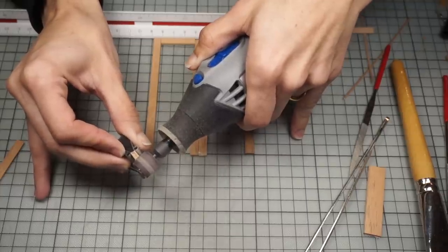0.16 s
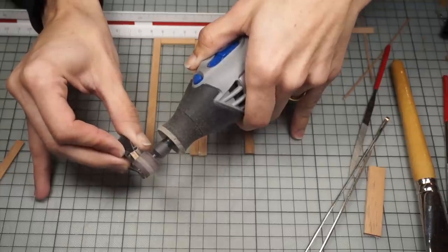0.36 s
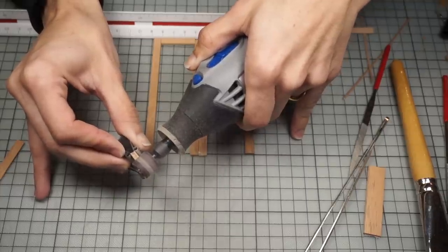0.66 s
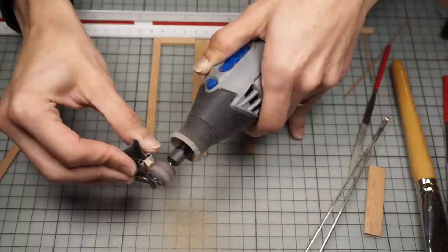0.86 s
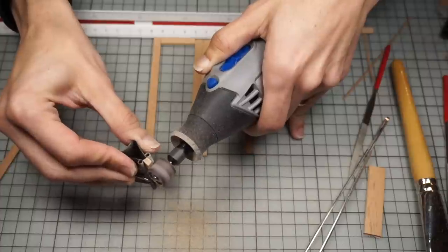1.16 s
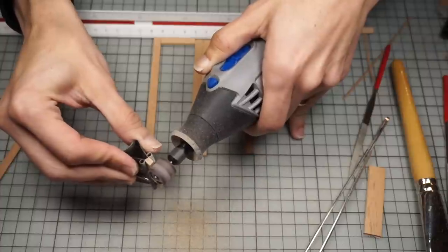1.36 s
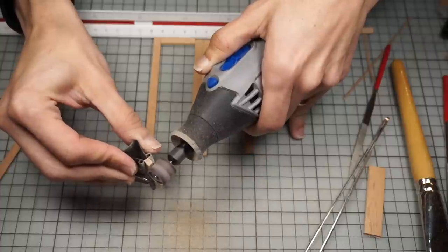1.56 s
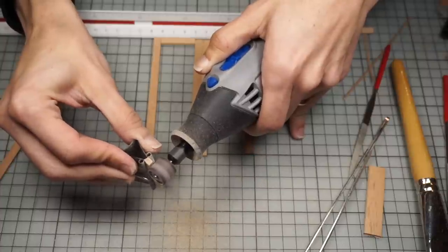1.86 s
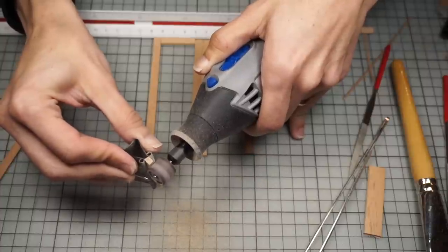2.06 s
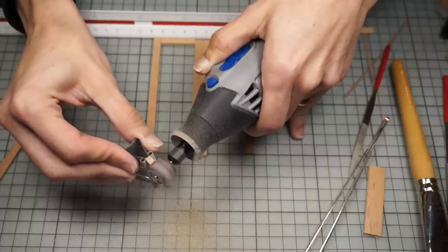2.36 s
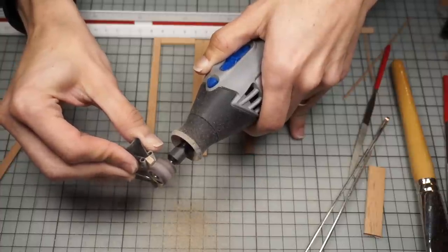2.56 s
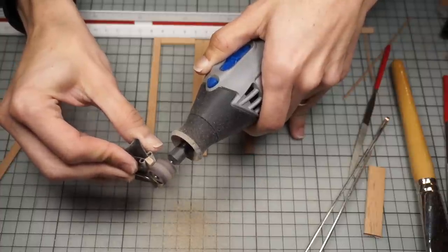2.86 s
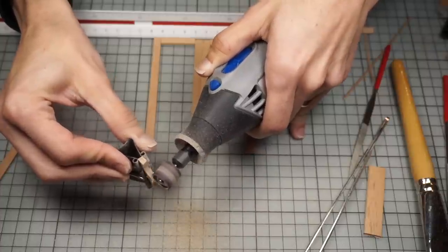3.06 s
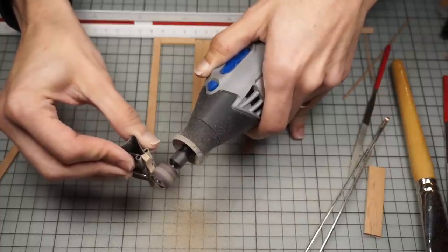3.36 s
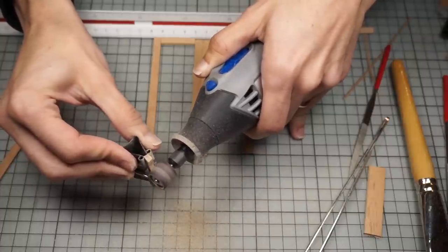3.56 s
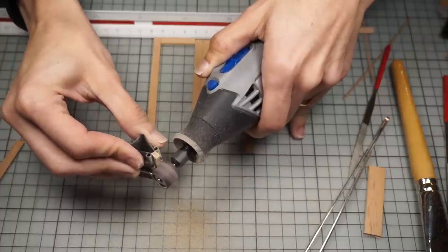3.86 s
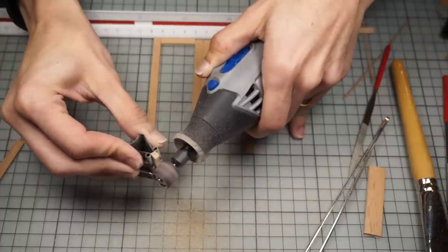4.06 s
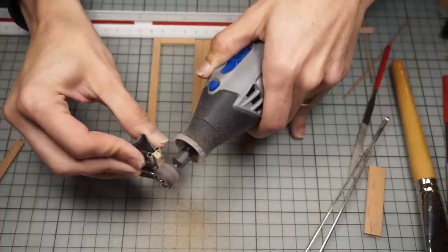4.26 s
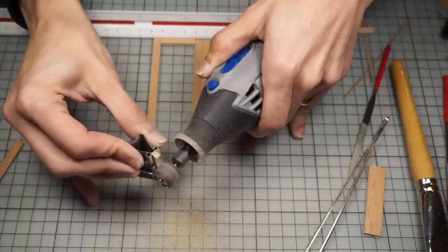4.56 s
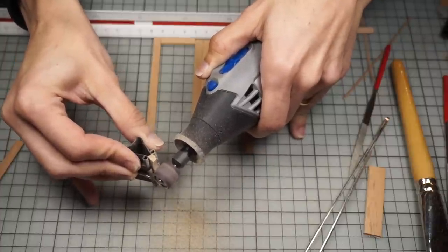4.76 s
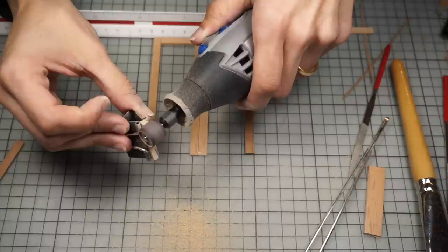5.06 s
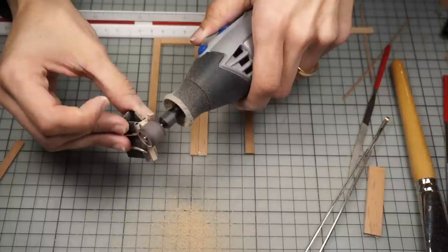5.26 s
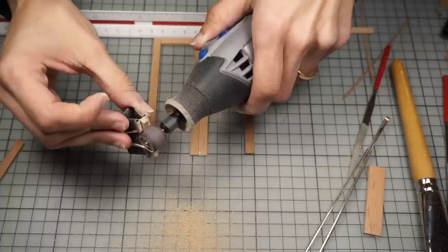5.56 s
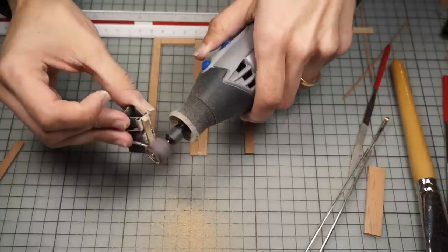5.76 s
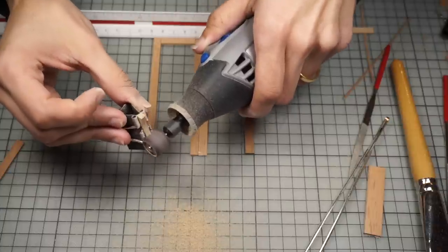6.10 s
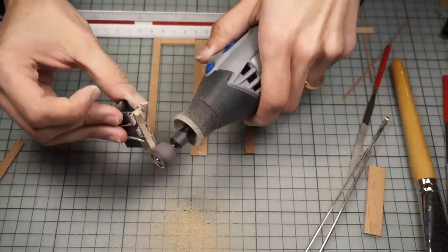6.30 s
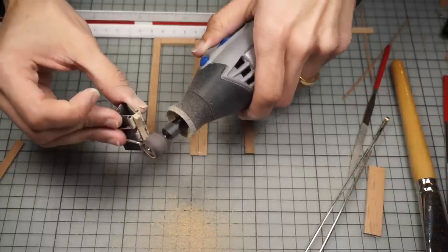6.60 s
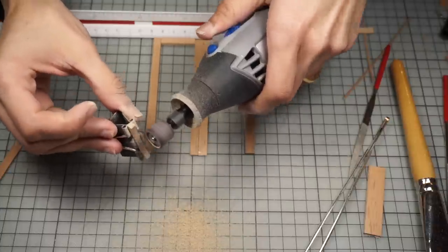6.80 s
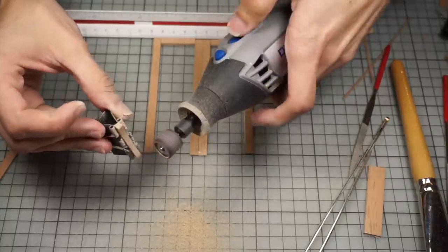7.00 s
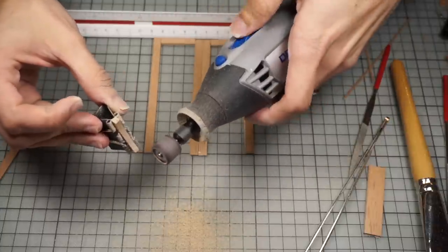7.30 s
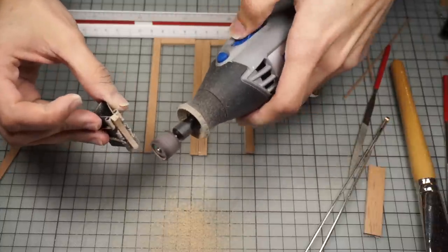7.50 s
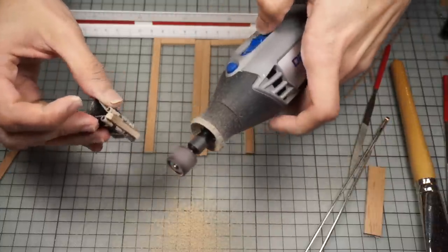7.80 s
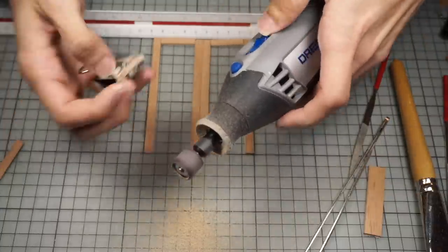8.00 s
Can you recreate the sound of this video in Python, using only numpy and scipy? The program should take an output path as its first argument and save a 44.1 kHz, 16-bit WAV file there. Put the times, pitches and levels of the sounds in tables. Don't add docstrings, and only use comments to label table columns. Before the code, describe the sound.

Close, bright electric tool whine with gritty sanding on wood, pitch bending under pressure, rising freely at the end before a switch click and falling coast-down.

```python
import sys
import numpy as np
from scipy import signal
from scipy.fft import rfft, irfft
from scipy.io import wavfile

SR = 44100
rng = np.random.default_rng(int(sys.argv[2]) if len(sys.argv) > 2 else 0)


def wav_out(sig):
    wavfile.write(sys.argv[1], SR, np.round(np.clip(np.atleast_2d(sig).T, -1, 1) * 32767).astype(np.int16))


def nominal_scale(level):
    x = np.asarray(level, float) / 20
    return 10 ** x


N = 358974
TIME = np.arange(N) / SR

# two scene changes, then the lift [t/s]
STAGE_S = [
    .775,
    5.083,
    6.76,
]
STAGE = np.searchsorted(STAGE_S, TIME)
# [t/s, click level/dB]
SWITCH = [
    (7.608, -37),
]
SLOTS, MAINS_HZ, FAN_ON_S = 16, 100, 6.85


def rms_one(x):
    return x / np.sqrt(np.mean(x ** 2) + 1e-20)


def in_time(rows):
    s, *columns = np.transpose(rows)
    return [np.interp(TIME, s, c) for c in columns]


def at_hz(points, hz):
    points = np.array(points)
    return np.interp(np.log(hz + 1), np.log(points[:, 0]), points[:, 1])


def running_free(rise_s):
    return np.clip((TIME - FAN_ON_S) / rise_s, 0, 1)


def drift(rate_hz):
    step = 100
    r = np.exp(-2 * np.pi * rate_hz * step / SR)
    noise = rng.standard_normal(N // step + 1002)
    slow = signal.lfilter([1], [1, -2 * r, r * r], noise)[1000:]
    return np.interp(np.arange(N) / step, np.arange(len(slow)), rms_one(slow))


def swell(start, end, first_db, last_db, fade, release=None):
    levels = [first_db - fade, first_db, last_db, last_db - (release or fade)]
    return np.interp(TIME, [start - 1, start, end, end + 1], levels)


def coloured(x, spectrum, low_hz, high_hz):
    hz = np.fft.rfftfreq(N, 1 / SR)
    bins = rfft(x) * nominal_scale(at_hz(spectrum, hz))
    inside = irfft(bins * (hz > low_hz) * (hz < high_hz), N)
    return irfft(bins, N) / np.std(inside)


def resonate(x, modes):
    out = 0
    for k, (hz, width_hz, db) in enumerate(modes):
        r = np.exp(-np.pi * width_hz / SR)
        poles = [1, -2 * r * np.cos(2 * np.pi * hz / SR), r * r]
        out = out + (-1) ** k * nominal_scale(db) * signal.lfilter([1 - r * r, 0, r * r - 1], poles, x)
    return out


def drum_pattern(turn, turns_per_change, count=300):
    rows = turn / turns_per_change
    grit = rng.standard_normal((int(rows[-1]) + 3, count + 1))
    grit[:, -1] = grit[:, 0]
    row, blend = rows.astype(int), np.pi / 2 * (rows % 1)
    grain = (turn % 1 * count).astype(int)
    return np.cos(blend) * grit[row, grain] + np.sin(blend) * grit[row + 1, grain]


def rumble():
    band = signal.butter(2, [35, 140], "band", fs=SR, output="sos")
    low = signal.sosfilt(band, rng.standard_normal((2, N)))
    level_db = -84.5 + 5 * (STAGE == 0)
    level_db = level_db + 14 * np.clip((TIME - 7.8) / 0.23, 0, 1)
    return nominal_scale(level_db) * rms_one(low[0] + 0.24 * low[1] * [[1], [-1]])


def room():
    # [f/Hz, density/dB per Hz]
    murmur = [(88, -59), (150, -21), (502, -3.5), (739, 9.5), (947, 6.5), (1300, -50), (1600, -5),
              (2080, -35), (3520, -120)]
    return nominal_scale(-57.5) * coloured(rng.standard_normal(N), murmur, 150, 1650)


def shaft_speed():
    # [t/s, settling speed/turns per s]
    load = [(0, 151.8), (0.03, 150.8), (0.33, 153.2), (0.52, 151.3), (0.66, 154.5), (0.775, 159.9),
            (0.858, 186.0), (1.25, 171.0), (1.43, 155.1), (1.62, 153.0), (1.72, 156.0), (1.82, 149.0),
            (2.13, 155.6), (2.35, 150.3), (2.86, 161.0), (2.99, 185.7), (3.46, 171.0), (3.63, 161.8),
            (4.21, 168.5), (4.48, 164.4), (4.7, 171.7), (5.0, 167.9), (5.083, 191.8), (5.52, 190.1),
            (5.7, 191.6), (6.01, 186.2), (6.28, 193.1), (6.65, 192.0), (6.75, 196.4), (7.04, 198.0)]
    rotor_s, hand_s, coast_turns_per_s2 = .12, .05, 150
    speed = np.zeros(N)
    for (_, before), (s, goal) in zip(load[:1] + load, load):
        after = TIME >= s
        age = TIME[after] - s
        if s == 0 or s in STAGE_S[:2]:
            speed[after] = goal
        else:
            lag = rotor_s * np.exp(-age / rotor_s) - hand_s * np.exp(-age / hand_s)
            speed[after] += (goal - before) * (1 - lag / (rotor_s - hand_s))
    return speed - coast_turns_per_s2 * np.maximum(TIME - 7.6, 0)


def switch():
    (s, db), = SWITCH
    age = TIME - s
    snap = resonate(rng.standard_normal(N), [(9600, 1500, 5.0), (5500, 2600, 2.0)])
    return nominal_scale(db) * snap * (age > 0) * np.exp(-np.abs(age) / 0.0034)


def coast_ring(power):
    # [f/Hz, width/Hz, level/dB]
    mode = [(2140, 110, 0)]
    level = nominal_scale(-58 + 1.9 * drift(18)) * (1 - power)
    return level * rms_one(resonate(resonate(rng.standard_normal(N), mode), mode))


def air(idle_db, turn):
    # [f/Hz, density/dB per Hz]
    loaded_air = [(2500, -23.5), (3000, -16), (3300, -21), (3800, -29), (4400, -28), (5100, -15),
                  (6000, -7.5), (11000, -13.5), (14300, -48)]
    # [f/Hz, density/dB per Hz]
    free_air = [(2500, -21), (3100, -11), (3600, -9), (4400, -18), (5250, -9.5), (7000, -3), (9000, -2.5),
                (10000, -6), (10400, -7), (11000, -20)]
    free = running_free(0.062)
    flow = rng.standard_normal(N) + .9 * drum_pattern(turn + .0015 * drift(25), 30.0)
    slow, fast = (coloured(flow, shape, 4830, 12000) for shape in (loaded_air, free_air))
    return nominal_scale(idle_db) * ((1 - free) * slow + free * fast)


def fan(speed, turn):
    # [order, level/dB]
    blades = [(24, -58), (33, -61), (47, -57), (48, -64), (49, -56.5), (64, -59), (65, -70), (66, -66)]
    # [f/Hz, gain/dB]
    vent = [(3000, -6), (4000, -14), (4700, -3), (5500, -7), (6300, 0), (7100, -1), (7650, -9), (8200, 5),
            (9000, 6), (10500, -1.5)]
    out, on = np.zeros(N), slice(int(FAN_ON_S * SR), N)
    rise = running_free(0.038)[on]
    relative = speed[on] / speed.max()
    for order, db in blades:
        slowing = relative ** (order / 40)
        blur = order / 400 * drift(40)[on] * (1 + 8 * (1 - relative))
        level_db = db + at_hz(vent, order * speed[on]) + 1.2 * drift(13)[on]
        tone = np.sin(2 * np.pi * (round(order) * turn[on] + blur))
        out[on] += nominal_scale(level_db) * rise * slowing * tone
    return np.sqrt(2) * out


def housing(turn, housing_db, mains, power):
    # [f/Hz, density/dB per Hz]
    shell = [(88, -40), (150, -26), (260, -22), (325, -22.5), (375, -16), (418, -21), (557, -12.5),
             (860, -7.5), (1070, -10.5), (1250, -5.5), (1580, -4.5), (1950, -1), (2250, -3), (2950, -8),
             (3250, -15), (3700, -18.5), (4240, -13.5), (11000, -27.5), (14300, -64), (22000, -120)]
    bearings = .6 * drum_pattern(turn, 25)
    noise = coloured(rng.standard_normal(N) + bearings, shell, 450, 1510)
    kick = np.exp(0.26 * np.cos(2 * np.pi * mains))
    band = signal.butter(2, [1400, 5000], "band", fs=SR, output="sos")
    upper = signal.sosfilt(band, noise)
    return nominal_scale(housing_db - 2.0) * (noise + power * upper * (rms_one(kick) - 1))


def passing_orders(turn, mains):
    passing = [(8, 1), (8, 2), (9, 1), (11, 1), (13, 1), (12, 1), (16, -1), (19, 1), (7, 1), (10, 1),
               (17, 0), (20, 0), (21, 0), (22, 0), (23, 0), (25, 0), (1, 1), (1, 0), (32, 0)]
    # [start t/s, end t/s, level/dB]
    passing_spans = [
        [(0., .75, -57), (1.5, 3.03, -55), (3.9, 4.2, -59), (5.4, 6.85, -58.5), (5.72, 5.98, -55)],
        [(0., .75, -62), (1.5, 3., -58), (3.3, 5.05, -55)],
        [(0., .75, -61), (1.2, 1.5, -47.5), (3.3, 3.6, -52), (5.75, 6.3, -58), (6.6, 7.58, -61)],
        [(0., .75, -52)],
        [(0., .75, -53)],
        [(1.5, 2.1, -51), (6.9, 7.58, -52)],
        [(5.7, 6.744, -58)],
        [(5.8, 6.3, -65)],
        [(6.9, 7.58, -57)],
        [(5.1, 7.58, -64)],
        [(.3, .75, -49), (2.35, 2.7, -52), (4.5, 5.05, -58)],
        [(0., .62, -57), (.62, .76, -49), (1.8, 2.1, -51), (2.3, 2.7, -65), (6.05, 6.27, -53.5)],
        [(0., .3, -62), (.3, .72, -61), (2.7, 2.95, -57), (3.55, 3.65, -53), (4.05, 4.2, -57)],
        [(1.5, 2.7, -61), (5.4, 5.7, -61)],
        [(5.45, 6.268, -59)],
        [(0., .45, -61), (.45, .8, -66)],
        [(5.1, 7.003, -76)],
        [(6.15, 6.8, -77), (6.8, 7.6, -83)],
        [(3.85, 5.07, -63)],
    ]
    out = np.zeros(N)
    for (order, side), spans in zip(passing, passing_spans):
        waver_db, slip_turns = 1.6 * drift(20), .02 * drift(20)
        for s, e, db in spans:
            on = slice(max(int((s - .1) * SR), 0), int((e + .1) * SR))
            outside_s = np.maximum(np.maximum(s - TIME[on], TIME[on] - e), 0)
            level_db = db - 300 * outside_s + waver_db[on]
            phase = order * turn[on] + side * mains[on] + slip_turns[on]
            out[on] += nominal_scale(level_db) * np.sin(2 * np.pi * phase)
    return np.sqrt(2) * out


def slot_buzz(speed, turn, buzz_db, mains, ring_hz, power):
    first_sides_db = [-5, -17, -9, 0, 0, 0, -15, -7, -7, -17, -15, -20]
    out, first = 0, STAGE == 0
    sweep = np.where(first, -.004, 0.036)
    for side, first_db in zip(range(-5, 7), first_sides_db):
        off_ring_hz = SLOTS * speed + side * MAINS_HZ - ring_hz
        near = np.exp(-.5 * (off_ring_hz / 270) ** 2 - 0.12 * (side + 0.31) ** 2)
        gain = np.where(first, nominal_scale(first_db - 3.0) * np.sign(1.5 - side), near)
        gain = gain * nominal_scale(np.where(first, .8, 1.2) * drift(11.0))
        out = out + gain * np.cos(2 * np.pi * (SLOTS * turn + side * mains - sweep * side ** 2))
    return power * nominal_scale(buzz_db) * out


def order_levels(touch, lost):
    # [on wood/dB, lifted/dB, free/dB]
    order_db = [(-68, -67, -69), (-82, -62, -64.5), (-78, -60.5, -79), (-73, -67, -76), (-63, -65, -60),
                (-55.5, -55.5, -51), (-94, -67, -58), (-61, -61, -56), (-85, -58, -63), (-63, -66, -58),
                (-91, -68, -74), (-76, -57, -58), (-69, -65, -69), (-76, -78, -77), (-61.5, -62, -63.5)]
    # [start t/s, end t/s, level/dB]
    shakes = [
        [(.05, .2, -60.5), (1.2, 1.4, -55.5), (3.35, 3.65, -57.5), (5.0, 6.8, -60.5)],
        [(.78, .9, -53), (1.35, 2.12, -54), (2.9, 3.05, -60), (3.6, 4.7, -55.5), (5.1, 5.72, -54),
         (5.8, 6.2, -54.5)],
        [(1.45, 1.75, -63), (2.05, 2.55, -74), (4.35, 4.55, -61)],
        [(0., .58, -48.5), (1.5, 2.12, -49.5), (2.6, 2.9, -54), (2.95, 3.04, -49), (4., 4.27, -48.5)],
        [(1.45, 1.72, -51), (3.45, 3.7, -52), (3.88, 4.27, -45.5), (4.8, 5., -56)],
        [(0., .3, -52), (1.2, 1.55, -48.5), (1.85, 3., -50.5), (3.95, 4.15, -53)],
    ]
    # [start t/s, end t/s, level/dB]
    sings = [
        [(0., .3, -50), (1.17, 1.3, -43), (1.35, 1.5, -44), (3.62, 3.7, -40), (4., 4.3, -68), (6.2, 6.24, -48),
         (6.65, 6.68, -40.5)],
        [(1.15, 1.5, -49), (3.48, 3.6, -38), (3.6, 3.75, -50), (4.2, 4.6, -51), (4.6, 5., -50),
         (5.1, 5.7, -50.5), (6.12, 6.24, -51)],
        [(.88, .94, -43), (1.3, 1.85, -50.5), (2.2, 2.8, -49), (3.01, 3.06, -36.5), (3.65, 3.92, -42.5),
         (3.92, 4.45, -43), (4.45, 4.74, -44.5), (4.74, 5.06, -43), (6.18, 6.25, -46)],
        [(.15, .6, -44), (.6, .76, -44), (1.53, 1.95, -40.5), (2.08, 2.12, -42), (2.15, 2.5, -56),
         (4.0, 4.2, -61), (4.6, 4.95, -46.5), (6.85, 7.0, -43.5), (7.0, 7.84, -40.5), (7.97, 8.14, -61)],
        [(0., .75, -55), (.53, .6, -37.5), (.6, .72, -38.5), (.2, .45, -44), (1.8, 2.55, -45),
         (2.85, 2.98, -60), (3.4, 3.55, -69)],
        [(0., .75, -52), (1.65, 1.95, -51), (2.6, 2.9, -47.5)],
        [(0., .3, -45), (1.2, 1.8, -51), (3.25, 3.55, -66)],
        [(1.8, 1.95, -44), (2.24, 2.52, -42), (2.85, 2.95, -43.5), (4.8, 4.95, -46.5)],
        [(0., .75, -58), (.95, 1.2, -59), (2.15, 2.75, -61), (3.08, 3.55, -58), (6.85, 7., -52.5),
         (7., 7.62, -51), (7.65, 7.8, -61), (7.8, 8.14, -66.5)],
    ]
    free = running_free(0.056)
    levels = []
    for (on, up, loose), spans in zip(order_db, shakes + sings):
        usual = up + touch * (on - up) + 2 * drift(10.0) + free * (loose - up) - 9 * lost
        levels.append(np.max([usual] + [swell(s, e, db, db, 268) for s, e, db in spans], axis=0))
    return levels


def shaft_tones(turn, levels_db, mains, power):
    strong_orders = (3, 4, 5, 6, 7, 8, 9, 10, 11, 12, 13, 14, 15, 16, 24)
    steady = [(0, 2), (1, 2), (2, -1), (0, 4), (0, 1), (0, 3), (1, 12), (32, 0), (1, 0)]
    # [view 1/dB, view 2/dB, view 3/dB, free/dB]
    steady_db = [(-77, -87, -99, -68), (-68.5, -64.5, -69, -72), (-88, -100, -90, -81),
                 (-68.5, -72, -72, -75), (-74, -87.5, -85.5, -90), (-74, -77.5, -82, -81),
                 (-85, -67, -63, -85), (-75, -59.5, -58.5, -58), (-70.5, -75, -80.5, -73.5)]
    out = 0
    free = running_free(0.049)
    coasting = np.maximum(power, nominal_scale(-20))
    for order, db in zip(strong_orders, levels_db):
        gain = nominal_scale(db + 1.3 * drift(52)) * (1 if order in (12, SLOTS, 24) else coasting)
        if order > SLOTS:
            gain = gain * (1 + 1.6 * (1 - 0.65 * free) * power * np.cos(2 * np.pi * mains))
        out = out + gain * np.sin(2 * np.pi * (order * turn + .02 * drift(20)))
    for (order, side), stage_db in zip(steady, steady_db):
        driven = power if side else coasting if order > 1 else 1
        gain = nominal_scale(np.array(stage_db)[STAGE] + 0.34 * drift(36)) * driven
        phase = order * turn + side * mains + 0.092 * drift(12) + rng.random()
        out = out + gain * np.sin(2 * np.pi * phase)
    return np.sqrt(2) * out


def contact(lost):
    # [start t/s, end t/s, hiss at start/dB, hiss at end/dB, wood ring/dB]
    touches = [(0, 0.775, -38, -37, -38.5), (0.783, 0.951, -38.5, -40.5, -34.5),
               (1.157, 2.113, -40.5, -39.5, -37.5), (2.09, 2.958, -40, -39.5, -57),
               (2.96, 3.056, -40.5, -37, -34), (3.408, 3.577, -39.5, -35, -44),
               (3.598, 4.04, -38.5, -38, -40.5), (4.02, 5.07, -39.5, -41.5, -37),
               (5.083, 5.45, -47.5, -52, -54), (5.437, 5.79, -48, -44, -56), (5.8, 5.917, -47, -54, -55),
               (5.923, 6.15, -45.5, -47, -42.5), (6.12, 6.267, -43, -40, -41),
               (6.638, 6.71, -43, -45.5, -57)]
    # [start t/s, end t/s, added level/dB]
    bites = [
        (.53, 0.592, 0.5),
        (2.07, 2.103, 2.5),
        (3., 3.052, 4.5),
        (4.99, 5.068, 2),
        (6.195, 6.268, 1),
    ]
    stage_db = [-1, -0.5, 0., 0.]
    land, lift = 600, 310
    lifted_db, free_db = -52.5, -51
    near_vent_db = lifted_db + 1
    hiss = np.max([swell(s, e, a, b, land, lift) for s, e, a, b, _ in touches], axis=0)
    wood = np.max([swell(s, e, w, w, land, lift) for s, e, _, _, w in touches], axis=0)
    idle = np.interp(TIME, [5.08, 5.09, FAN_ON_S - .06, FAN_ON_S + 0.051],
                     [lifted_db, near_vent_db, near_vent_db, free_db]) - 3 * lost
    touch = np.clip((hiss - lifted_db) / 10, 0, 1)
    housing_db = -48 + 2 * touch - 16 * lost + np.array(stage_db)[STAGE]
    housing_db = housing_db + sum(np.maximum(swell(s, e, db, db, 300), 0) for s, e, db in bites)
    return hiss, idle, np.maximum(wood, -55), housing_db, touch


def sanding(turn, mains, hiss_db, wood_db, power):
    # [f/Hz, density/dB per Hz]
    rasp_shape = [(350, -39.5), (600, -35), (941, -12.5), (1050, -81), (1100, -43), (1840, -7), (2120, -21),
                  (2700, -9.5), (3300, -16.5), (3650, -18.5), (3950, -25), (4250, -16.5), (9860, -16),
                  (11000, -36), (14300, -60), (22000, -120)]
    # [f/Hz, width/Hz, level/dB]
    wood_modes = [(1547, 73, -2.5), (1901, 140, 7), (1660, 25, -9)]
    grip_s = (0, .775, 1.1, 1.29, 1.5, 2.1, 2.6, 3.3, 3.6, 3.85, 4.5, 4.9, 5.083, 5.85, 6.5, 6.76)
    # [f/Hz, width/Hz, level/dB]
    early_grips = [
        [(3570, 49, 2.5), (4910, 45, 1), (6060, 44, -20), (7420, 220, -1), (9640, 370, 1), (10660, 110, -1)],
        [(4270, 34, 6), (4960, 33, 5), (6250, 180, 0), (7040, 46, 5), (8480, 34, -9), (9450, 42, -6)],
        [(4400, 27, -4), (5070, 26, -3), (5300, 22, -2), (6000, 23, -12), (6810, 34, -4), (8000, 44, -1)],
        [(4350, 76, 3), (4740, 50, 5), (5080, 33, 0), (6400, 52, -1), (7100, 160, -5), (8260, 150, -6)],
        [(4250, 110, 5), (4780, 210, 2), (6280, 58, 0), (7120, 110, 7), (8510, 370, -1), (9700, 140, -3)],
        [(3660, 46, -2), (4830, 210, 2), (5470, 55, -6), (7360, 75, -4), (7940, 290, 0), (9350, 97, 0.5)],
        [(3620, 44, 0), (4850, 100, 4), (6260, 79, -8), (7180, 69, 8), (8300, 82, 1), (10100, 270, -7)],
    ]
    # [f/Hz, width/Hz, level/dB]
    later_grips = [
        [(4300, 74, -11), (4730, 120, -8), (4970, 30, 1), (4900, 25, -5), (7300, 47, 1), (9900, 84, -3)],
        [(5080, 86, -4), (6970, 55, 1), (7800, 48, 4), (8750, 55, -9), (9570, 100, -2), (10300, 60, -17)],
        [(4340, 45, -4), (5200, 28, 1.5), (7150, 110, -3.5), (8000, 76, -6), (9900, 400, -10.5),
         (10540, 26, -16)],
        [(4320, 49, -7), (5280, 66, 2), (6300, 130, -16), (7160, 120, -7), (7700, 140, 0), (9960, 92, 0.5)],
        [(5200, 68, -10), (7690, 31, -3), (8530, 26, -9), (9730, 36, -5), (10300, 40, -5), (10600, 31, -3)],
        [(4180, 35, -7), (4600, 180, 5), (6140, 93, 0), (6880, 53, -12), (8630, 48, -1), (9190, 37, -10)],
        [(4410, 170, 6), (5250, 43, -12), (6080, 70, -13), (6800, 44, -9), (6550, 95, -9), (9050, 29, -24)],
        [(3720, 38, 1), (4415, 39, 1), (5390, 38, -10), (6400, 53, -6), (6950, 110, -5), (8900, 100, -26)],
    ]
    touching = TIME < grip_s[-1]
    slip_turns = .002 * drift(25)
    fibres = np.where(TIME < STAGE_S[1], .42, .9) * rng.standard_normal(N)
    grit = touching * drum_pattern(turn + slip_turns + 1, 13) + fibres
    high_spot = 0.22 * np.cos(2 * np.pi * turn)
    throb = 0.035 * np.cos(2 * np.pi * mains)
    grit = rms_one(grit * np.exp(high_spot + throb))
    rasp = coloured(grit, rasp_shape, 3400, 10800) * 0.53
    sways = [drift(6.3) for _ in early_grips[0]]
    for modes, start, end in zip(early_grips + later_grips, grip_s, grip_s[1:]):
        held = slice(int(start * SR), int(end * SR))
        rings = 0
        for (hz, width_hz, db), sway in zip(modes, sways):
            rings = rings + resonate(grit[held], [(hz, width_hz + 90, db)]) * nominal_scale(1.5 * sway[held])
        rasp[held] += 0.43 * rms_one(rings)
    wood = rms_one(resonate(drum_pattern(turn, 5.0), wood_modes)) * nominal_scale(wood_db - 6.0) * power
    return rasp * nominal_scale(hiss_db + 1.0 + 0.77 * drift(30)) + wood


def microphone(x):
    # [f/Hz, level/dB]
    left_louder = [(60, 2), (110, -2.5), (220, -1.5), (420, 1), (810, 4), (1550, 3), (2960, 7.5),
                   (5670, 14), (10900, 14)]
    # [f/Hz, phase/rad]
    right_lead = [(60, 1.5), (150, 0.55), (450, 1.5), (3000, 1.3663), (3700, 2), (5000, 1.4), (8300, -8.5),
                  (10000, 1)]
    # [f/Hz, share]
    likeness = [(60, 0.8), (125, 0.65), (250, 0.75), (450, 0.96), (2900, 0.93), (4200, 0.55), (11000, 0.45)]
    hz = np.fft.rfftfreq(N, 1 / SR)
    echoes = rng.standard_normal(8000) * np.exp(-TIME[:8000] / 0.12)
    echoes = rfft(echoes / np.linalg.norm(echoes), N)
    alike = np.clip(at_hz(likeness, hz), 0, 1)
    shadow = nominal_scale(-at_hz(left_louder, hz))
    path = alike * np.exp(1j * at_hz(right_lead, hz)) + np.sqrt(1 - alike ** 2) * echoes
    left = rfft(x) * 2 / np.sqrt(1 + shadow ** 2)
    return np.array([irfft(left, N), irfft(left * shadow * path, N)])


def scene():
    # [t/s, lag/ms, housing ring f/Hz]
    pulses = [(0, 4.5, 2250), (.77, 4, 2130), (.78, 0.7, 2740), (3.8, 3, 2750), (3.86, 0, 2770),
              (7.6, 2.2, 3270)]
    buzz_stage_db = [4, 2, -10.5, -3]
    speed = shaft_speed()
    power = 1. * (TIME < SWITCH[0][0])
    lost = 2 * (1 - speed / speed.max()) * (1 - power)
    hiss_db, idle_db, wood_db, housing_db, touch = contact(lost)
    eased = (speed - 150) / 40
    buzz_db = -40.5 - 13.5 * eased + np.array(buzz_stage_db)[STAGE]
    lag_ms, ring_hz = in_time(pulses)
    turn, mains = np.cumsum(speed) / SR, MAINS_HZ * (TIME - lag_ms / 1000)
    tool = shaft_tones(turn, order_levels(touch, lost), mains, power)
    tool = tool + fan(speed, turn) + passing_orders(turn, mains)
    tool = tool + slot_buzz(speed, turn, buzz_db, mains, ring_hz, power)
    tool = tool + housing(turn, housing_db, mains, power)
    tool = tool + sanding(turn, mains, hiss_db, wood_db, power)
    tool = tool + air(idle_db, turn) + switch() + coast_ring(power)
    return microphone(tool + room()) + rumble()


def roll_off(x):
    return signal.sosfilt(signal.butter(12, 11460, fs=SR, output="sos"), x)


def record(dry):
    below_top = np.fft.rfftfreq(N, 1 / SR) < 11050
    narrow = irfft(rfft(dry) * below_top, N)
    return roll_off(narrow)


dry = scene()
out = record(dry)
wav_out(out)
```